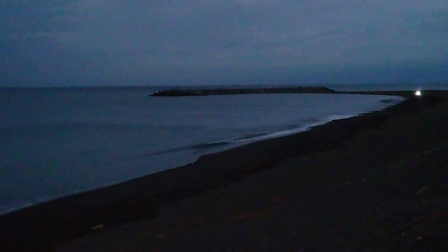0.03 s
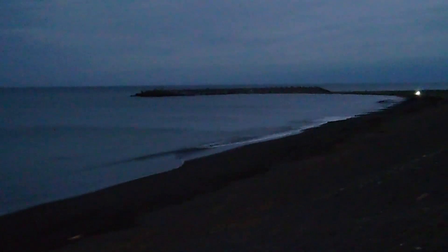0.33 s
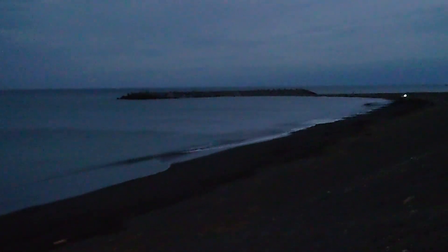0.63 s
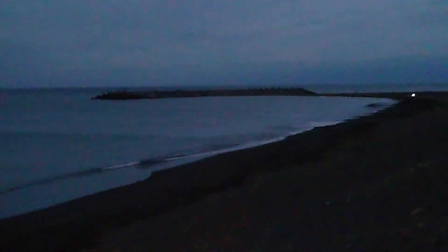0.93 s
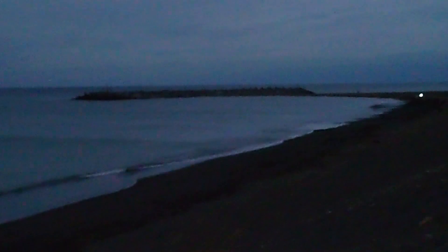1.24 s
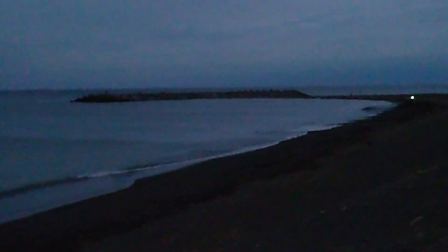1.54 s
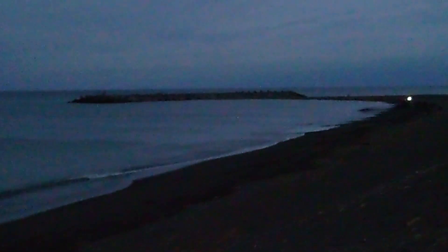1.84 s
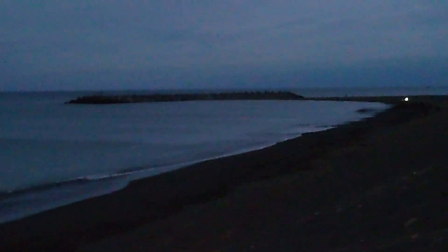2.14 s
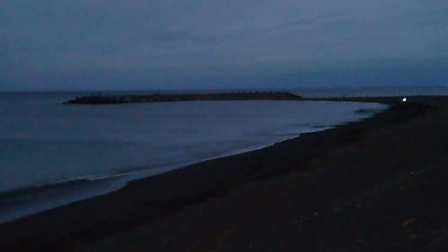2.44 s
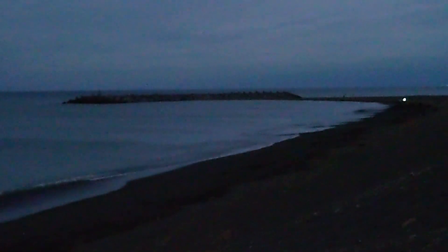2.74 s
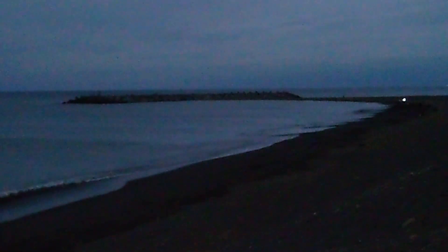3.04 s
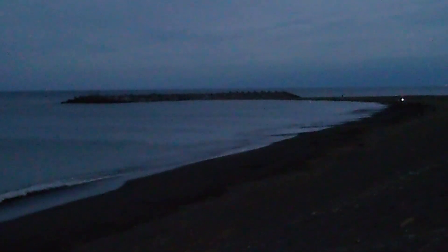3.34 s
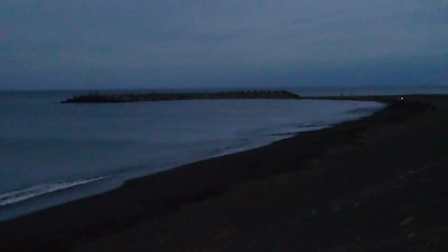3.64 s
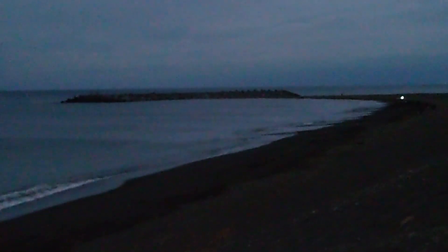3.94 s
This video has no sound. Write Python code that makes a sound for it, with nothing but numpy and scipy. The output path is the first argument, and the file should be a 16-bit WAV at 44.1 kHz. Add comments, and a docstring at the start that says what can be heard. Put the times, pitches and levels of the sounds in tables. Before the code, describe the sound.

A small wave builds over a distant wash, breaks with a slap and soft thuds, then foams and gurgles up the beach toward the microphone. Another ripple starts to spill while light wind rumbles underneath.

```python
"""A small wave breaks along a beach and runs up the sand towards the microphone.
Over a distant wash its crest spills, throws drops, then slaps and thuds down. Foam churns and big
bubbles gurgle while the next ripple starts to spill. The hiss of countless tiny bubbles is made from
noise; single bubbles and drops are short, rising tones. Light wind rumbles on the microphone
over a faint, far drone."""
import sys
import numpy as np
from scipy import signal
from scipy.fft import rfft, irfft
from scipy.io import wavfile
from scipy.ndimage import uniform_filter1d

SR = 44100
rng = np.random.default_rng(int(sys.argv[2]) if len(sys.argv) > 2 else 0)


def file_out(sig):
    """Save sig as 16-bit WAV at sys.argv[1]."""
    # one column per channel
    cols = np.atleast_2d(sig).T
    # limit, then scale
    lim = np.clip(cols, -1, 1)
    pcm = np.round(lim * 32767).astype(np.int16)
    wavfile.write(sys.argv[1], SR, pcm)


N = 176400
TIME, FREQ = np.arange(N) / SR, np.arange(N // 2 + 1) * SR / N

# How each sound swells and fades. Each row: time in seconds, gain in dB.
WASH_LEVEL = [(0, 0.5), (.6, -0.5), (.95, -1), (1.22, 1), (1.8, -4.5), (2.5, -15), (4, -27)]
WIND_LEVEL = [(0, -1.5), (.6, -1), (1, -4), (1.5, 0), (2.2, 2), (2.8, 1.5), (3.3, 0), (4, 0)]
DRONE_LEVEL = [(0, -1), (.6, 2), (1.1, -1.5), (1.6, 6), (2, -5), (3, 0.5), (4, -1.5)]
CREST_LEVEL = [(0, -25.5), (.5, -19.5), (.85, -16), (1.05, -10), (1.45, -6), (1.57, -3.5), (1.63, -1),
               (1.71, -2.2), (1.78, -3.5), (2.08, -3.5), (2.35, -9.5), (2.65, -16.5), (4, -29)]
ROLL_LEVEL = [(0, -12.5), (1.45, -11), (1.62, -4), (1.8, -4.5), (2.1, 0), (2.45, 0), (2.65, -2.5),
              (2.87, 1), (3.0, -2.5), (4, -10.5)]
FOAM_LEVEL = [(0, -40), (1.4, -11), (1.9, -3), (2.28, -2), (2.38, 2), (2.65, -1.5), (2.85, -1.5),
              (3.2, -4.5), (3.5, -8), (4, -15)]
GURGLE_LEVEL = [(0, -24), (1, -17), (1.6, -10.5), (2.1, -4), (2.45, 0), (2.65, 0), (2.87, 1), (3.3, -0.5),
                (3.6, -2), (4, -9)]
RIPPLE_LEVEL = [(0, -49), (3, -16), (3.27, -7), (3.38, 0.5), (3.6, .5), (3.8, 1), (4, -2)]
# Each noise's mix of bass and treble. Each row: frequency in Hz, starting strength in dB per Hz.
WASH_COLOUR = [(150, -82.5), (450, -77.5), (700, -74), (1050, -69.5), (1500, -70), (2000, -73),
               (2800, -66.5), (3300, -69.5), (4000, -76.5), (5300, -81.5), (6600, -92.5), (7900, -92.5),
               (10000, -99), (16000, -99)]
WIND_COLOUR = [(8, -70), (20, -62), (28, -55), (50, -58), (70, -58.5), (100, -66.5), (150, -73.5),
               (300, -83), (1000, -105)]
CREST_COLOUR = [(200, -76), (500, -64.5), (950, -66), (1500, -64.5), (2000, -60), (2650, -58.5),
                (3700, -63.5), (5200, -61), (5900, -67), (6700, -73.5), (7900, -72.5), (9500, -77.5),
                (16000, -81)]
SLAP_COLOUR = [(150, -67), (600, -74), (1400, -63.5), (2600, -59), (4000, -71.5), (5300, -63), (7000, -83),
               (13000, -81), (16000, -82)]
ROLL_COLOUR = [(40, -80), (90, -60.5), (150, -61), (220, -62.5), (310, -71), (430, -71), (800, -95),
               (2000, -115)]
FOAM_COLOUR = [(250, -77), (500, -70), (800, -64), (1050, -65.5), (1350, -67), (2400, -66), (3300, -73.5),
               (4200, -74.5), (5200, -78), (6500, -88), (7600, -82), (8700, -84.5), (10500, -83),
               (16000, -86.5)]
RIPPLE_COLOUR = [(400, -80), (1100, -77), (1450, -77.5), (1950, -88), (2600, -75.5), (3050, -76.5),
                 (3450, -83.5), (4100, -78.5), (4550, -80.5), (5150, -78.5), (5600, -83), (6000, -85.5),
                 (6700, -91), (16000, -102)]
# The drone's tones. Each row: pitch in Hz, width of its wander in Hz, starting level in dB.
DRONE_TONES = [(69.64, 6, -45), (84.4, 3.02, -45)]
# Slaps of the wave's falling lip. Each row: time of the peak in seconds, gain in dB.
SLAPS = [(1.625, 1.5), (1.705, -2)]
# Thuds of falling water. Each row: time of the peak in seconds, width in seconds, level in dB.
THUDS = [(1.657, 0.05, -51), (1.927, .04, -30.5), (2.097, 0.047, -32.5), (3.062, .04, -37.5)]
# The filter that shapes the gurgle. Each row: frequency in Hz, gain in dB.
GURGLE_BAND = [(200, -26), (400, -16), (520, -1), (680, 1), (820, 0), (960, -10), (1600, -11)]
# How the left channel hears a place, compared with the right.
# Each row: frequency in Hz, gain in dB, likeness from 0 to 1, head start in milliseconds.
FROM_FAR_SHORE = [(250, -2, 0.94, 0.1), (610, 1.5, 0.62, 0.24), (1080, -4.5, 0.8, 0.3),
                  (1600, -10, 0.9, 0.36), (2120, -24, 0.5, 0.33), (2860, -34, .6, 0.53),
                  (3820, -17.5, 0.7, 0.44), (4700, -16, 1, 0.46), (5750, -30, .3, 0.51),
                  (6600, -18, 0, .44), (7740, -7, 0.2, .44), (12500, -23, 0, .44), (15000, -21, .1, .44)]
FROM_NEAR_SHORE = [(140, 1, 1, 0.15), (300, -0.5, 0.94, .35), (580, 2, 0.75, 0.21),
                   (1220, -3.5, 0.63, 0.44), (1900, -9, 1, 0.33), (2630, -18, .65, 0.43),
                   (3700, -0.5, 0.21, 0.493), (4900, -2.5, 0.55, 0.466), (5900, -4.5, 0.35, 0.53),
                   (7200, 3, 0.15, 0.52), (11500, -8, .1, .48), (15000, -2, .1, .48)]
FROM_SHALLOWS = [(400, 0, .85, 0.11), (1480, 2, 0.71, 0.18), (2730, -14, 0.42, 0.38),
                 (4140, -6, 0.53, 0.13), (5800, -13, 0.43, 0.16), (9000, -3, 0.16, 0.19)]


def gain(db):
    """Turn decibels into a number to multiply by."""
    return 10 ** (np.asarray(db) / 20)


def swell(curve):
    """Gain over time, from rows of seconds and dB."""
    return gain(np.interp(TIME, *np.array(curve).T))


def per_frequency(table, column=1):
    """Fill in a table's column for every frequency."""
    rows = np.array(table)
    return np.interp(np.log(FREQ + 1), np.log(rows[:, 0]), rows[:, column])


def wander(rate):
    """A smooth random curve of spread 1 that heads for a new value `rate` times a second."""
    hold = max(int(SR / rate), 2)
    steps = rng.standard_normal(N)[np.arange(N) // hold]
    curve = uniform_filter1d(uniform_filter1d(steps, hold), hold)
    return curve / np.std(curve)


def wavering_tone(hz, width_hz, rate):
    """A tone whose pitch drifts at random."""
    pitch = hz + width_hz / 2 * wander(rate)
    return np.sqrt(2) * np.sin(2 * np.pi * np.cumsum(pitch) / SR)


def noise(colour):
    """Two unrelated noises of the given colour."""
    white = rfft(rng.standard_normal((2, N)))
    return irfft(white * gain(per_frequency(colour)), N) * np.sqrt(SR / 2)


def bubble_cloud(colour, flicker_db, surge_db, rate):
    """The hiss of countless bubbles: its octaves flicker separately and surge together."""
    spectrum, hiss = rfft(noise(colour)), 0
    octave = np.clip(np.log2((FREQ + 1) / 125), 0, 7)
    for k in range(8):
        band = irfft(spectrum * np.maximum(1 - abs(octave - k), 0), N)
        hiss = hiss + band * gain(flicker_db * wander(rate))
    return hiss * gain(surge_db * wander(rate))


def bubbles(hz, spread_octaves, cycles, rise, scatter_db, count):
    """Two streams of bubbles, each ringing as a fading tone that rises a little."""
    streams = np.zeros((2, 2 * N))
    starts, chance = rng.integers(N, size=count), rng.standard_normal((count, 2))
    for k, (start, (pitch, strength)) in enumerate(zip(starts, chance)):
        bubble_hz = np.clip(hz * 2 ** (spread_octaves * pitch), 100, SR / 3)
        turns = np.arange(int(2 * cycles * SR / bubble_hz)) * bubble_hz / SR
        age = turns / cycles  # at age 1 the tone has faded to a twentieth
        tone = np.sin(2 * np.pi * turns * (1 + rise * age / 2)) * 20.0 ** -age
        streams[k % 2, start:start + len(tone)] += tone * gain(scatter_db * min(strength, 2))
    return streams[:, :N] / np.std(streams[:, :N])


def wash():
    """Bubbles hiss far along the shore."""
    return bubble_cloud(WASH_COLOUR, flicker_db=0.64, surge_db=1, rate=14.6) * swell(WASH_LEVEL)


def wind():
    """Light wind rumbles on the microphone."""
    return noise(WIND_COLOUR) * gain(wander(12) / 2) * swell(WIND_LEVEL)


def drone():
    """Two low, unsteady tones hum far away."""
    hum = sum(gain(db + wander(4.88)) * wavering_tone(hz, width, rate=8) for hz, width, db in DRONE_TONES)
    return hum * swell(DRONE_LEVEL)


def crest():
    """The top of the wave spills with a bright hiss and throws drops."""
    hiss = bubble_cloud(CREST_COLOUR, flicker_db=0.46, surge_db=0.24, rate=45)
    drops = bubbles(hz=2980, spread_octaves=0.59, cycles=6, rise=0.089, scatter_db=7, count=3000)
    return (hiss + gain(-44) * drops) * swell(CREST_LEVEL)


def slaps(attack_s=0.021, release_s=0.046):
    """The falling lip hits the water in two quick bursts of noise."""
    bursts = sum(gain(db) * np.exp(-np.maximum((at - TIME) / attack_s, (TIME - at) / release_s))
                 for at, db in SLAPS)
    return noise(SLAP_COLOUR) * bursts


def roll():
    """The broken wave rolls in with a deep rumble."""
    return bubble_cloud(ROLL_COLOUR, flicker_db=1.5, surge_db=0, rate=17) * swell(ROLL_LEVEL)


def thuds():
    """Falling water lands in short pulses of a very low tone."""
    pulses = sum(gain(db) * np.exp(-((TIME - at) / width) ** 2 / 2) for at, width, db in THUDS)
    return pulses * wavering_tone(hz=48.05, width_hz=20.2, rate=40)


def churn(octaves_per_s=0.34, width_hz=520):
    """A hollow ringing in the foam, stirred at random, sinks as the wave rolls on."""
    hz = 2035 * 2 ** (-octaves_per_s * (TIME - 2.4))  # passes 2035 Hz at 2.4 seconds
    phase = 2 * np.pi * np.cumsum(hz) / SR
    ringing = wander(width_hz) * np.cos(phase) + wander(width_hz) * np.sin(phase)
    return ringing / np.std(ringing)


def foam():
    """Foam runs up the sand, hissing, churning and fizzing with tiny bubbles."""
    hiss = bubble_cloud(FOAM_COLOUR, flicker_db=0.6, surge_db=0.3, rate=40)
    churning = np.array([churn(), churn()])
    fizz = bubbles(hz=6000, spread_octaves=0.59, cycles=4.4, rise=0.11, scatter_db=3, count=2400)
    return (hiss + gain(-39) * churning + gain(-49) * fizz) * swell(FOAM_LEVEL)


def gurgle():
    """Big bubbles trapped under the broken wave ring at lower pitches."""
    tones = bubbles(hz=666, spread_octaves=0.269, cycles=13.8, rise=0.055, scatter_db=2.5, count=5000)
    return irfft(rfft(tones) * gain(-38 + per_frequency(GURGLE_BAND)), N) * swell(GURGLE_LEVEL)


def ripple():
    """The next small crest starts to spill, with a hollow hiss."""
    return bubble_cloud(RIPPLE_COLOUR, flicker_db=1.1, surge_db=0, rate=20) * swell(RIPPLE_LEVEL)


def stereo(pair, place):
    """Place a sound: the left channel hears it earlier, mostly duller and only partly alike."""
    right, other = rfft(pair)
    likeness = np.clip(per_frequency(place, column=2), 0, 1)
    head_start = np.exp(2j * np.pi * FREQ * per_frequency(place, column=3) / 1000)
    blend = likeness * head_start * right + np.sqrt(1 - likeness ** 2) * other
    left = gain(per_frequency(place)) * blend
    return irfft(np.array([left, right]), N)


def scene():
    """The sea from three places, over low sounds that are nearly the same in both channels."""
    far = stereo(wash() + crest() + slaps(), FROM_FAR_SHORE)
    near = stereo(roll() + foam() + gurgle(), FROM_NEAR_SHORE)
    shallows = stereo(ripple(), FROM_SHALLOWS)
    wind_middle, wind_sides = wind()
    low = (wind_middle + drone() + thuds()) * gain([[0.3], [-0.3]])  # a touch louder on the left
    sides = gain(-16) * wind_sides * np.array([[1], [-1]])  # opposite signs widen the wind
    return far + near + shallows + low + sides


def record(dry, top_hz=15750):
    """The recorder cuts off the highest treble."""
    return signal.sosfilt(signal.ellip(12, .1, 90, top_hz, fs=SR, output="sos"), dry)


dry = scene()
out = record(dry)
file_out(out)
```